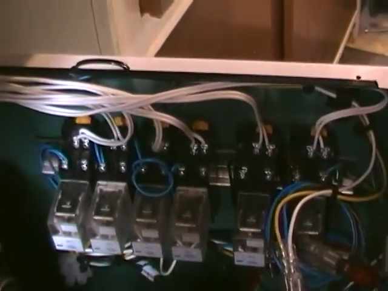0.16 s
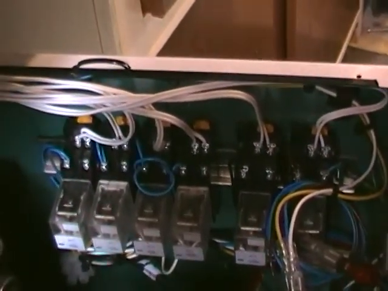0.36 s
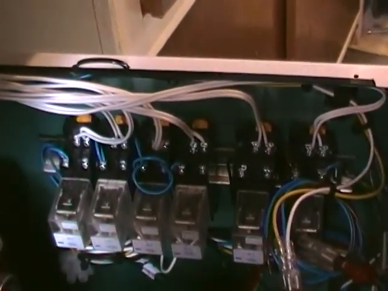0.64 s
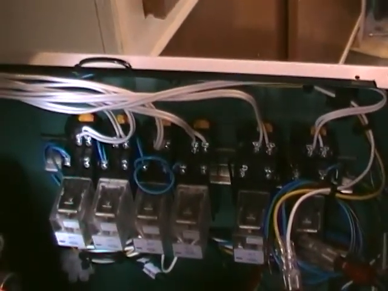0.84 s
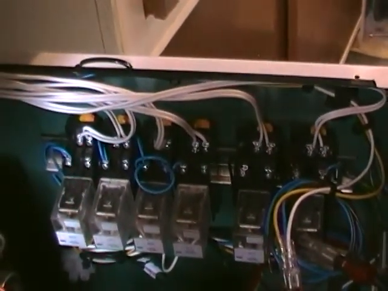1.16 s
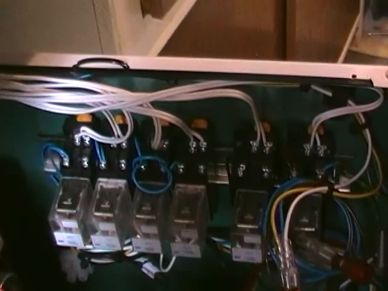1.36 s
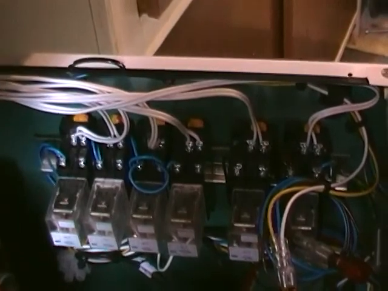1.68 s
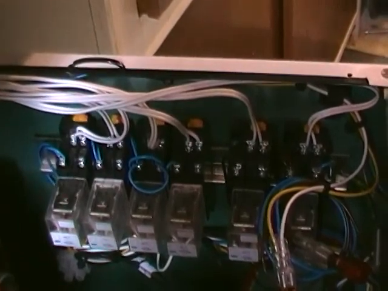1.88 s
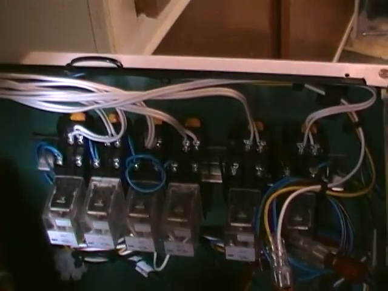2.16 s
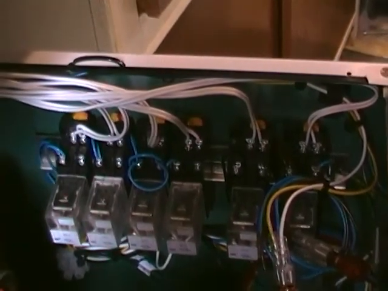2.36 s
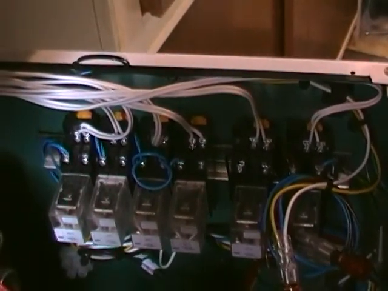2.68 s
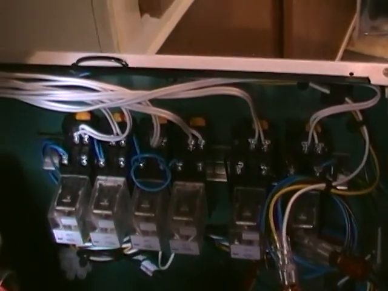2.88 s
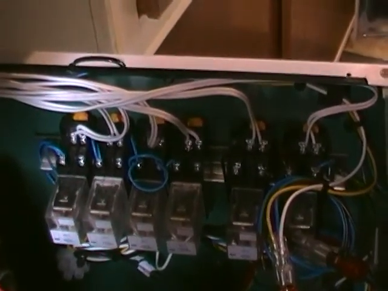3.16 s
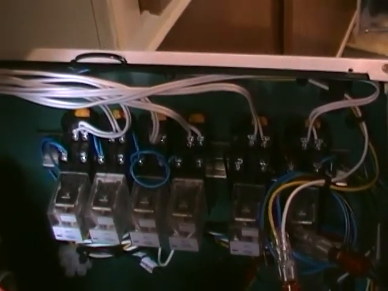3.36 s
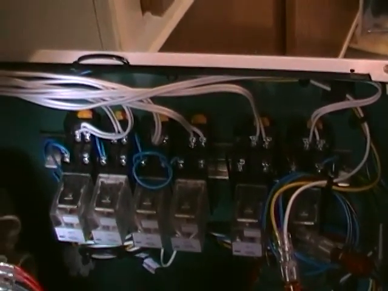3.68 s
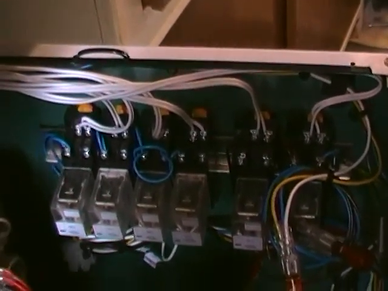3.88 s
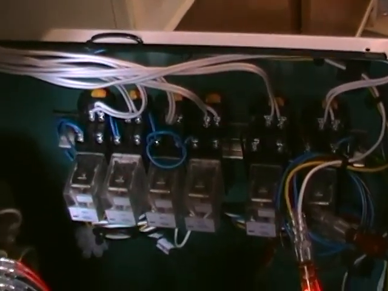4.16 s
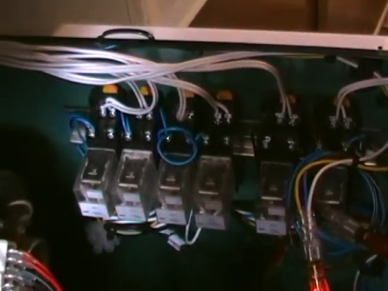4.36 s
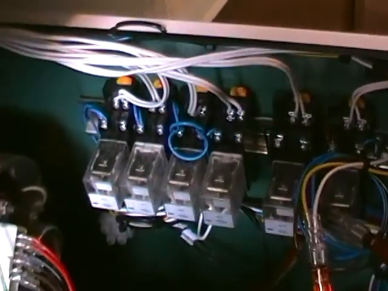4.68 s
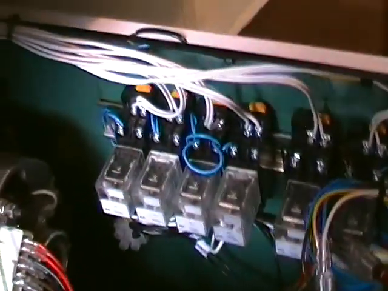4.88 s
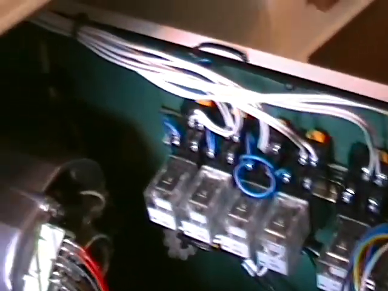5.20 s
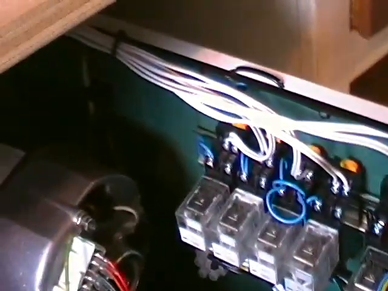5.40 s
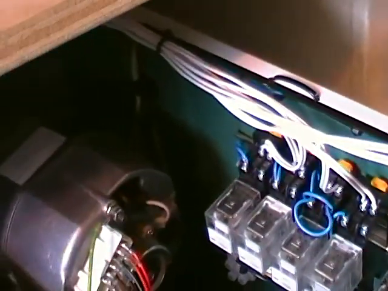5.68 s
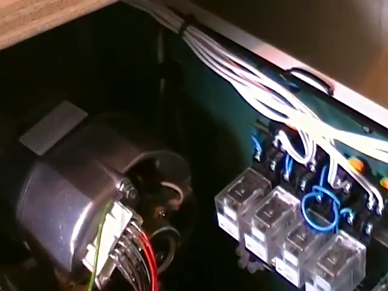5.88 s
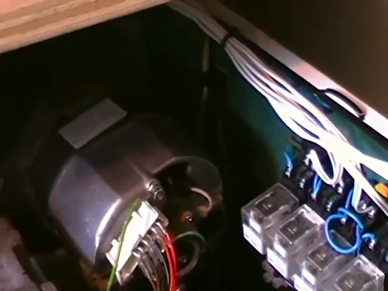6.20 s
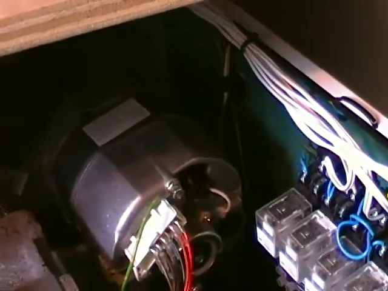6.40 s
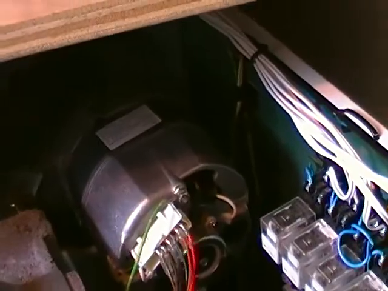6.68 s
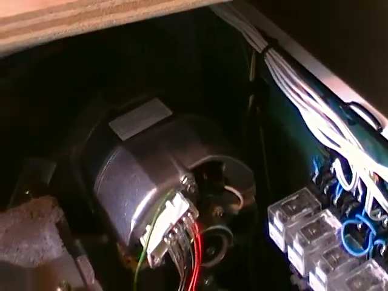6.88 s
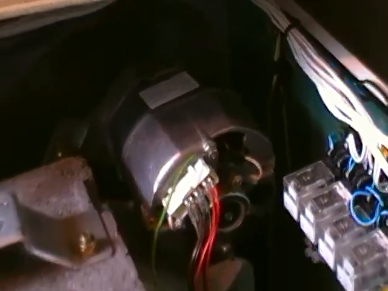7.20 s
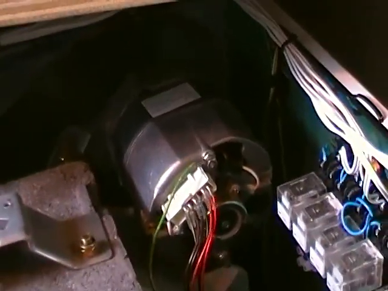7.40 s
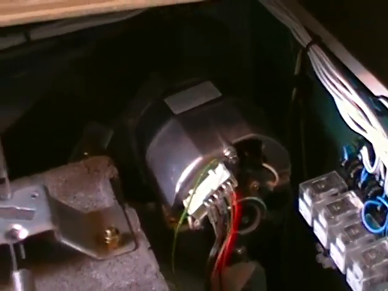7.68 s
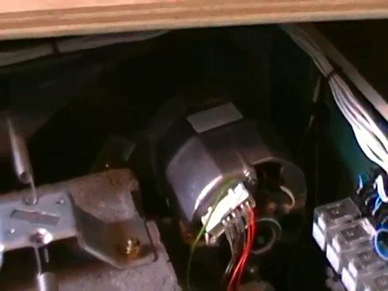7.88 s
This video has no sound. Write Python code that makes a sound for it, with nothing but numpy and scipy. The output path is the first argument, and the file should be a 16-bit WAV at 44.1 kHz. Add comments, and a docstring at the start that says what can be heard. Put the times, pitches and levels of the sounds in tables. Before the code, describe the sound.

Two sharp relay clicks, then a washing machine motor starts with a belt chirp and hums while the drum rumbles and knocks.

```python
"""Inside an open washing machine, close to the row of relays that drives it.
Two relays snap over their ringing springs and a faint fan hum. The induction motor then starts with a
scuff and a chirp of its belt and drones on even multiples of the mains frequency, while the drum rumbles,
swishes, ticks and knocks. The cabinet's ring shifts as the listener moves from relays to motor."""
import sys
import numpy as np
from scipy import signal
from scipy.fft import rfft, irfft, next_fast_len
from scipy.io import wavfile

SR = 44100
rng = np.random.default_rng(int(sys.argv[2]) if len(sys.argv) > 2 else 0)


def inscribe(sig):
    """Save sig as 16-bit PCM at rate SR to the path in sys.argv[1].

    A 1-D sig is mono; a 2-D sig holds one channel per row.
    Samples are clipped to [-1, 1] before scaling.
    """
    pcm = np.round(np.clip(np.atleast_2d(sig).T, -1, 1) * 32767)
    wavfile.write(sys.argv[1], SR, pcm.astype(np.int16))


N = 355005
TIME = np.arange(N) / SR
MAINS_HZ = 50.02
START_S, GRIP_S = 3.385, 3.457  # the motor switches on, then the belt grips and the drum turns


def amp(db):
    """Decibels to gain."""
    return 10 ** (np.asarray(db) / 20)


def unit(x):
    """Scales to rms 1."""
    return x / np.sqrt(np.mean(x ** 2) + 1e-20)


def eq_curve(points, hz):
    """Reads a spectrum on a log-frequency axis."""
    f, value = np.transpose(points)
    return np.interp(np.log(hz + 1), np.log(f + 1), value)


def automation(points):
    """Joins (time, value) breakpoints into a curve over the whole scene."""
    return np.interp(TIME, *np.transpose(points))


def add(mix, start_s, sound):
    """Mixes a stereo sound in at its cue."""
    part = mix[:, round(start_s * SR):][:, :sound.shape[1]]
    part += sound[:, :part.shape[1]]


def drift(rate_hz):
    """Smooth random wander of rms 1."""
    size = next_fast_len(N)
    hz = np.arange(0, min(4 * rate_hz, SR / 2), SR / size)
    real, imaginary = rng.standard_normal((2, len(hz)))
    return unit(irfft((real + 1j * imaginary) * np.exp(-(hz / rate_hz) ** 2), size)[:N])


def stereo(drive, gain, width):
    """Filters two unrelated drives, as mid and side, into a left-right pair of rms 1."""
    size = next_fast_len(drive.shape[1])
    hz = np.fft.rfftfreq(size, 1 / SR)
    mid, side = rfft(drive, size) * gain(hz)
    side = side * amp(eq_curve(width, hz))
    return unit(irfft([mid + side, mid - side], size)[:, :drive.shape[1]])


# stereo width of the running machine: (frequency [Hz], side relative to mid [dB])
MACHINE_WIDTH = [(60, -12), (110, -22), (200, -11), (350, -40), (640, -25), (1150, -17), (2070, -15.5),
                 (3730, -8.5), (6720, -7.5), (12100, -4)]


def noise(colour, size, envelope=1, tilt_db_per_octave=0, width=MACHINE_WIDTH):
    """Coloured stereo noise, shaped by an envelope and then scaled to rms 1."""
    drive = rng.standard_normal((2, size)) * envelope
    return stereo(drive, lambda hz: amp(eq_curve(colour, hz) + tilt_db_per_octave * np.log2(hz + 1)), width)


# colour of the room tone: (frequency [Hz], relative level [dB])
AIR_COLOUR = [(12, -46), (20, -7), (101, -3), (151, -5), (245, -8.5), (296, -14.5), (444, -22),
              (1170, -22.5), (1270, -24.5), (1380, -25.5), (1670, -27), (7140, -33.5), (7950, -31),
              (11300, -34.5), (12600, -47), (16400, -79), (22000, -120)]
# its stereo width: (frequency [Hz], side relative to mid [dB])
AIR_WIDTH = [(60, -15), (110, -18), (200, -18), (350, -9.5), (640, -9), (1150, -9), (2070, -3.5),
             (3730, -3.5), (6720, 0.5), (12100, -1)]


def room_air(stir_db=-41, still_db=-48.5, settle_s=0.83):
    """A bed of still air whose low stir dies down."""
    air = noise(AIR_COLOUR, N, width=AIR_WIDTH)
    low = signal.sosfiltfilt(signal.butter(2, 330, fs=SR, output="sos"), air)
    low_db = still_db + (stir_db - still_db) * np.exp(-(TIME / settle_s) ** 2)
    return amp(low_db) * unit(low) + amp(-52.5) * unit(air - low)


# tones of the fan and electronics: (frequency [Hz], rms level [dB])
FAN_TONES = [(98.3, -52.5), (197.4, -54.5), (246.3, -46), (295.6, -60.5), (344.6, -66), (393.8, -64),
             (1281, -64), (7800, -66.5), (7827, -79.5)]


def fan(waver_rad=0.11):
    """A small fan and the electronics hold faint tones that waver together."""
    waver = waver_rad * drift(4.6)
    tones = sum(amp(db) * np.sin(2 * np.pi * (hz * TIME + rng.random()) + waver) for hz, db in FAN_TONES)
    return np.sqrt(2) * tones


# relay hits: (time [s], crack level [dB], crack t60 [s], tail level [dB], tail t60 [s],
# bounce delay [s], bounce relative to crack [dB], spring level [dB])
RELAY_HITS = [(0.1399, -7, 0.055, -23.5, 0.19, 0.014, -20, -28),
              (3.046, -4.5, 0.029, -19.5, 0.17, 0.018, -24, -29)]
# colour of the crack, one list per relay: (frequency [Hz], relative level [dB])
CRACK_COLOURS = [
    [(250, -50), (600, -22.5), (1100, -10), (1700, -16), (2700, -14.5), (3500, -4), (3970, 3), (4400, -18),
     (5000, -5), (5600, -17), (6200, -7), (7300, -17), (9500, -8), (12500, -23), (14000, -40)],
    [(250, -47), (700, -25), (1200, -18), (1700, -5.5), (2600, -17), (3400, -4), (4200, -3), (5500, -13),
     (7100, -4), (7700, -16), (8700, 0), (10500, 1), (11400, -7), (12500, -19), (14000, -28)],
]
# ring of spring and contact blades, one list per relay: (frequency [Hz], relative level [dB], t60 [s])
SPRING_MODES = [
    [(1167, -2, .63), (2360, -23.5, 0.92), (3456, -13.5, 0.62), (3865, -18, .23), (4560, -21, .7),
     (5520, -11, .52), (6500, -19, 0.78), (7540, -20, .5), (9200, -20, 0.55), (10650, -28, .34)],
    [(1172, -7, 1), (3460, 1, 0.87), (4280, 1, .15), (4587, -22, 1), (6508, -22, 0.9), (7360, -13, 0.65),
     (8909, -15, .3), (9609, -14, 0.42), (9841, -18, 0.31), (10500, -17, .26), (10700, -18, 0.69)],
]
# stereo width of the cracks: (frequency [Hz], side relative to mid [dB])
RELAY_WIDTH = [(60, -11), (110, -13), (200, -16), (350, -14), (640, -22), (1150, -19), (2070, -13),
               (3730, -15), (6720, -8), (12100, -8.5)]


def relay(hit, colour, modes, attack_s=0.00047, beat_depth=0.31, beat_hz=13):
    """The armature slams home and bounces; the cabinet echoes, the spring rings. Gives (cue, sound)."""
    start_s, crack_db, crack_t60, tail_db, tail_t60, bounce_s, bounce_db, spring_db = hit
    t = np.arange(SR) / SR
    slam = amp(-60 * t / crack_t60)
    bounce = amp(bounce_db - 60 * abs(t - bounce_s) / crack_t60) * (t > bounce_s)
    envelope = np.hypot(amp(crack_db) * (slam + bounce), amp(tail_db - 60 * t / tail_t60))
    ring = np.zeros((2, SR))
    for hz, db, t60 in modes:
        phase = rng.uniform(0, 2 * np.pi) + np.array([[0], [hz / 9000]])  # reaches the right side later
        rate_hz = beat_hz * rng.uniform(0.56, 1.42)
        beat = 1 + beat_depth * np.sin(2 * np.pi * (rate_hz * t + rng.random()))  # close pairs of modes
        ring += amp(spring_db + db - 60 * t / t60) * beat * np.sin(2 * np.pi * hz * t - phase)
    crack = envelope * noise(colour, SR, width=RELAY_WIDTH)
    attack = np.minimum(t / attack_s, 1)
    return start_s, (crack + ring) * attack * amp([[.5], [-.5]])


def run_up(rise_s, creep_db):
    """Fade-in of the start: a quiet creep while the belt is slack, then a quick rise to full."""
    creep = np.clip((TIME - START_S) / (GRIP_S - START_S), 0, 1)
    grip = np.clip((TIME - GRIP_S) / rise_s, 0, 1)
    return amp(creep_db) * creep * (1 - grip) + grip


# partials of the magnetic hum: (multiple of the mains, relative level [dB])
HUM_PARTIALS = [(2, -29), (4, -0.5), (6, -20), (8, -22), (10, -22), (12, -22), (16, -22.5)]
# level ride of the hum as the motor pulls: (time [s], level [dB])
HUM_RIDE = [(3.52, -15), (3.67, -11.5), (3.73, -17.5), (4.14, -16.5), (4.39, -19), (4.44, -25.5),
            (4.65, -18), (5.26, -18.5), (5.59, -26), (5.66, -19.5), (5.73, -26), (5.83, -15), (6.12, -24.5),
            (6.14, -19), (6.57, -24.5), (6.61, -19.5), (7.61, -24.5), (8.05, -20)]


def motor_hum(trim_db=-0.3, beat_hz=8.51, beat_db=0.9, flutter_db=1.1, wobble_rad=0.064):
    """Magnetic pull shakes the stator; rotor slip makes the hum beat and the load makes it waver."""
    beat = np.cos(2 * np.pi * beat_hz * (TIME - GRIP_S) + .5 * drift(1))
    drone = np.zeros(N)
    for multiple, db in HUM_PARTIALS:
        phase = 2 * np.pi * (multiple * MAINS_HZ * TIME + rng.random())
        drone += amp(db) * np.sin(phase + wobble_rad * drift(23))
    level_db = trim_db + automation(HUM_RIDE) + beat_db * beat + flutter_db * drift(10)
    return np.sqrt(2) * run_up(rise_s=.055, creep_db=-17) * amp(level_db) * drone


# load on the drum, heard as the strength of its rumble: (time [s], level [dB])
DRUM_LOAD = [(3.55, -27.5), (3.74, -19.5), (4.16, -22.5), (4.26, -17), (4.64, -25), (4.7, -20), (5.47, -20),
             (5.59, -25.5), (5.63, -20), (5.7, -27), (5.83, -20.5), (6.77, -24), (6.96, -21.5), (7.69, -26),
             (7.89, -24), (7.91, -17.5), (7.99, -27), (8.05, -23)]


def load_gain(db, follow, fall_db_per_s, usual_load_db=-21):
    """Fader of a rolling layer: `follow` dB per dB of load, and a steady fall as the listener draws away."""
    load_db = automation(DRUM_LOAD) - usual_load_db
    return amp(db + follow * load_db - fall_db_per_s * (TIME - GRIP_S))


# the listener's move: (time [s], place [0 over the relays, 1 over the motor])
LISTENER_PATH = [(3.4, 0.019), (4.6, 0.039), (5.3, 0.33), (6.1, 0.62), (7.0, 0.89), (8.05, 0.98)]
# low, middle and top layers of the rolling drum, each: (frequency [Hz], relative level [dB])
RUMBLE_COLOUR = [(30, -18), (80, -22), (110, -6), (180, -5.5), (240, 0.5), (340, -2.5), (480, 1),
                 (620, -0.5), (780, -1.5), (900, -14.5), (1300, -17.5), (3000, -56)]
SWISH_COLOUR = [(500, -19), (900, -2), (1050, -4), (1160, 3), (1300, -6), (1650, -6), (1900, -4.5),
                (2200, -3.5), (2600, -8), (2850, -9), (3050, -12), (3700, -13.5), (4300, -23.5),
                (8000, -35)]
HISS_COLOUR = [(2000, -8), (4000, -2.5), (5600, 0.5), (6100, 2), (6600, 2.5), (7100, 1.5), (7550, 0.5),
               (8100, 1), (8700, -0.5), (10000, -3), (11200, -6), (12000, -17), (12700, -32), (13500, -45)]


def drum(throb=0.32, lump_depth_db=2.0, grit_db=2.0, rise_s=.018):
    """Rolling contact comes in lumps, pulses with the motor torque, and rings the cabinet."""
    place = automation(LISTENER_PATH)
    torque = 1 + throb * np.cos(2 * np.pi * 2 * MAINS_HZ * TIME)
    lumps_db = lump_depth_db * drift(45)
    grit = amp(grit_db * drift(990))
    rumble = amp(-2.5) * noise(RUMBLE_COLOUR, N, torque * amp(lumps_db))
    rumble += amp(-1.25) * cabinet_ring(torque, place)
    swish = wall_echoes(noise(SWISH_COLOUR, N, grit * amp(0.5 * lumps_db)), place) + air_gap(place)
    hiss = wall_echoes(noise(HISS_COLOUR, N, np.sqrt(grit) * amp(0.33 * lumps_db)), place)
    rumble *= load_gain(-21.5, follow=0.93, fall_db_per_s=0.12)
    swish *= load_gain(-27, follow=0.37, fall_db_per_s=0.35)
    hiss *= load_gain(-31.5, follow=0.34, fall_db_per_s=0.76)
    return run_up(rise_s, creep_db=-5.5) * (rumble + swish) + run_up(rise_s, creep_db=-19) * hiss


# resonances of tub and cabinet:
# (frequency [Hz], half-width [Hz], relative level over the relays [dB], relative level over the motor [dB])
CABINET_MODES = [(101.8, 5.5, -16, -28), (157.3, 5.5, -11, -18), (203.4, 6.2, -9.5, -13),
                 (300.3, 4.6, -7.5, -23), (419.8, 11.5, -3.5, -1.5), (438.2, 6.2, -7.5, -8.5),
                 (545.7, 11.3, -4.5, -15), (639.7, 4.1, -30, 1.5), (670, 9.9, -6, -39),
                 (720, 7.3, -21, -27), (995, 13, -30, -14), (1187, 34, -17.5, -13), (1820, 49, -14.5, -32),
                 (2816, 40, -17, -37), (7100, 75, -20, -27), (8130, 48, -26, -21)]


def cabinet_ring(torque, place):
    """Throbbing noise rings tub and cabinet; two balances of their modes crossfade as the listener moves."""
    centre_hz, half_width_hz, relay_end_db, motor_end_db = np.transpose(CABINET_MODES)[:, :, None]
    drive = rng.standard_normal((2, N)) * torque

    def ring(db):
        peaks = amp(db) / np.sqrt(half_width_hz)
        return stereo(drive, lambda hz: (peaks / (1 + ((hz - centre_hz) / half_width_hz) ** 2)).sum(0),
                      MACHINE_WIDTH)

    near = place ** 2  # the motor's own rings are heard only from close by
    return np.sqrt(1 - near ** 2) * ring(relay_end_db) + near * ring(motor_end_db)


def wall_echoes(sound, place, echo_gain=.2, stretch=.3, tremor_s=.00004, count=6):
    """Echoes off the steel walls; their paths change as the listener moves, so the colour ripples."""
    out = sound.copy()
    tremor = tremor_s * drift(2)
    for delay_s in rng.uniform(0.000977, .012, count):
        delayed_time = TIME - delay_s * (1 + stretch * rng.uniform(-1.01, 1) * place) - tremor
        out += echo_gain * np.array([np.interp(delayed_time, TIME, channel) for channel in sound])
    return unit(out)


def air_gap(place, glide_hz=(2200, 2784), swell_db=(-17.5, -11.5), open_place=.65, width_hz=120):
    """The air gap beside the listener rings: a rushing band that slides with the size of the gap."""
    phase = 2 * np.pi * np.cumsum(np.interp(place, [0, open_place], glide_hz)) / SR
    band = unit(drift(width_hz) * np.cos(phase) + drift(width_hz) * np.sin(phase))
    return amp(np.interp(place, [0, 1], swell_db)) * band


def ticks(per_s=14, level_db=-43, t60=0.038, spread_db=3):
    """Loose parts tick at random while the drum turns."""
    strengths = amp(spread_db * np.minimum(rng.exponential(1, N), 3))
    hits = strengths * (rng.random(N) < per_s / SR)
    envelope = signal.lfilter([1], [1, -amp(-60 / (t60 * SR))], hits)
    return amp(level_db) * noise(HISS_COLOUR, N, envelope, tilt_db_per_octave=-2.5) * (TIME > GRIP_S)


# scuffs of the slipping belt: (centre time [s], length [s], level [dB])
BELT_SCUFFS = [(3.474, 0.02, -24.5), (3.493, .025, -18.5), (3.512, 0.044, -33), (3.886, .15, -25)]
# tones of its chirp: (centre time [s], length [s], frequency [Hz], level [dB])
BELT_CHIRPS = [(3.875, 0.18, 1922, -25.5), (3.9, 0.097, 6132, -28), (3.885, 0.056, 6800, -37),
               (3.9, .09, 6810, -39), (3.6, 0.056, 9200, -39), (3.905, 0.028, 9453, -28)]


def belt():
    """The belt slips on the pulley as it takes up the load, scuffing and chirping."""
    out = np.zeros((2, N))
    for centre_s, length_s, db in BELT_SCUFFS:
        size = round(length_s * SR)
        add(out, centre_s - length_s / 2, amp(db) * np.hanning(size) * noise(HISS_COLOUR, size))
    slip = .5 * drift(120)  # one phase jitter roughens all the tones
    for centre_s, length_s, hz, db in BELT_CHIRPS:
        swell = np.cos(np.pi * np.clip((TIME - centre_s) / length_s, -.5, .5)) ** 2
        out += np.sqrt(2) * amp(db) * swell * np.sin(2 * np.pi * hz * TIME + slip * hz / 3000)
    return out


# knocks of the turning drum: (time [s], relative level [dB], t60 [s], brightness [dB per octave])
DRUM_KNOCKS = [(3.795, -23, 0.088, 2), (4.251, -19.5, .08, 2.5), (4.291, -18, 0.14, 2.5),
               (4.393, -12.5, 0.12, 0.5), (4.588, -13, 0.062, 0), (5.112, -22.5, .07, 6.5),
               (5.22, -20, 0.1, 4), (6.033, -7.5, 0.1, 0.5), (6.123, -17.5, 0.065, 1),
               (6.264, -15.5, 0.15, -2), (6.618, -24.5, .06, 6.5), (6.941, -11.5, 0.1, -0.5),
               (7.047, -15, 0.064, -1.5), (7.333, -19, 0.039, -4), (7.6, -18.5, 0.064, 0.5),
               (7.790, -13.5, 0.097, 1.5), (7.907, -15.5, 0.15, -3.5)]
# body of a knock: (frequency [Hz], relative level [dB])
KNOCK_BODY = [(10, -60), (80, -9), (300, 9), (700, 5.5), (1100, 6.5), (1420, 6), (1750, -8), (2200, -6),
              (2800, -12), (4400, -12.5), (5500, -15), (10000, -23), (13000, -48)]


def knocks(attack_s=0.00298, hold_s=0.0062, trim_db=-2.5):
    """Short rattling blows inside the drum, each a burst of noise that holds briefly and dies."""
    out = np.zeros((2, N))
    t = np.arange(SR // 3) / SR
    for time_s, db, t60, brightness in DRUM_KNOCKS:
        envelope = np.minimum(t / attack_s, 1) * amp(db - 60 * np.maximum(t - hold_s, 0) / t60)
        add(out, time_s - attack_s / 2, envelope * noise(KNOCK_BODY, len(t), tilt_db_per_octave=brightness))
    return amp(trim_db) * out


def scene():
    """Over air and fan, two relays snap and then the machine runs; the mix leans slightly left."""
    mix = room_air() + fan() + motor_hum() + drum() + knocks() + ticks() + belt()
    for hit, colour, modes in zip(RELAY_HITS, CRACK_COLOURS, SPRING_MODES):
        add(mix, *relay(hit, colour, modes))
    return mix * amp([[.18], [-.18]])


def record(dry):
    """The loudest peaks clip, then a steep low-pass takes off the top end."""
    lowpass = signal.firwin(255, cutoff=12900, window=("kaiser", 8), fs=SR)
    return signal.oaconvolve(np.clip(dry, -1, 1), lowpass[None], "same")


dry = scene()
out = record(dry)
inscribe(out)
```